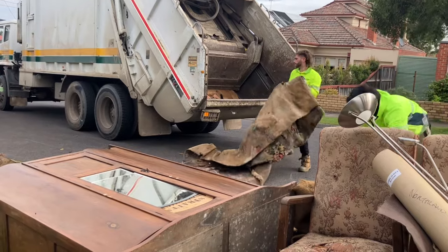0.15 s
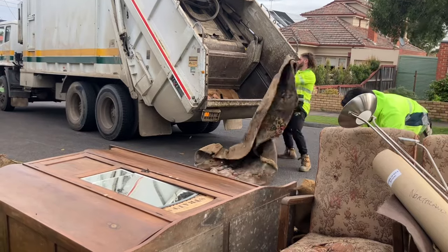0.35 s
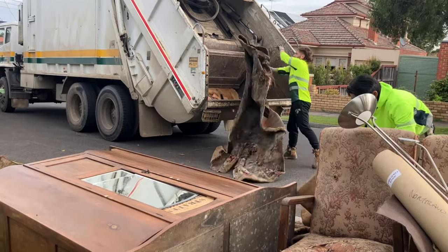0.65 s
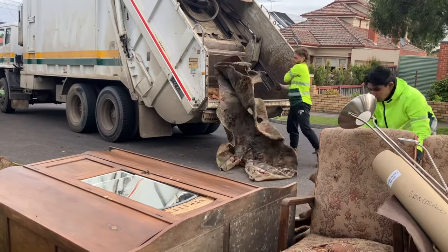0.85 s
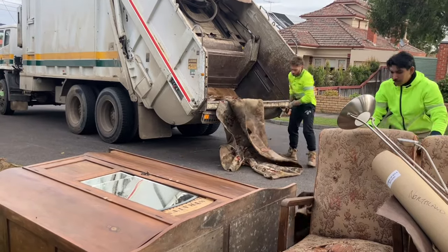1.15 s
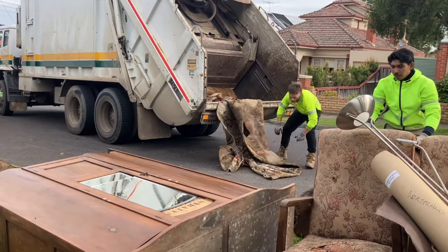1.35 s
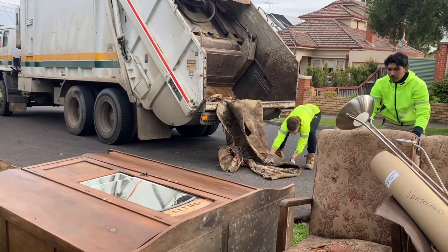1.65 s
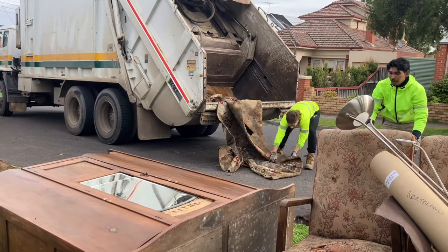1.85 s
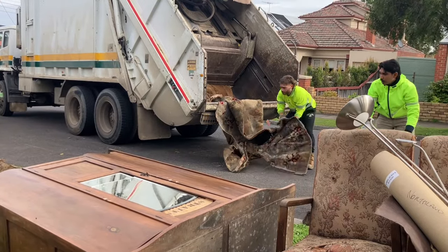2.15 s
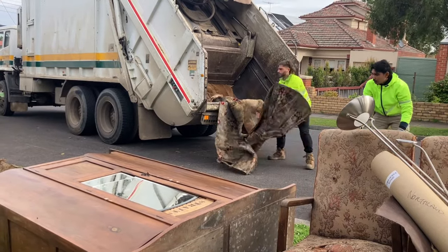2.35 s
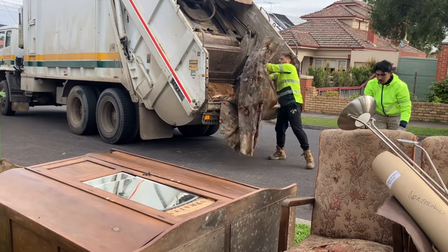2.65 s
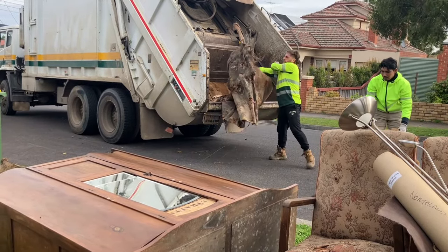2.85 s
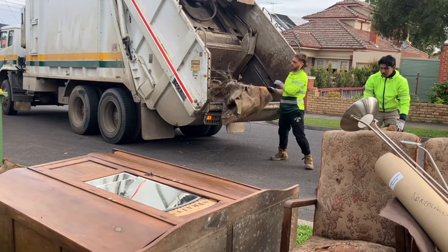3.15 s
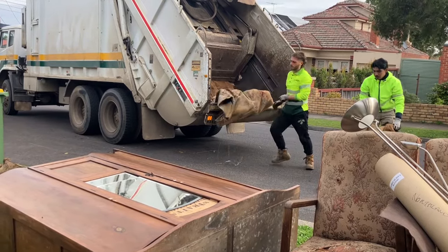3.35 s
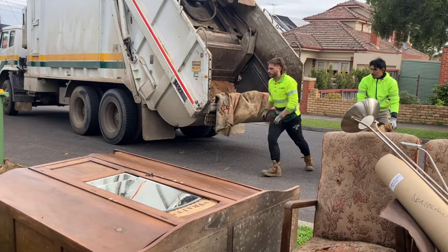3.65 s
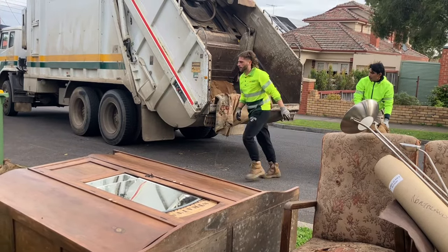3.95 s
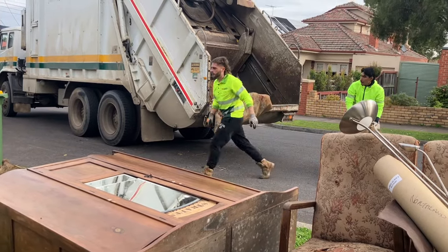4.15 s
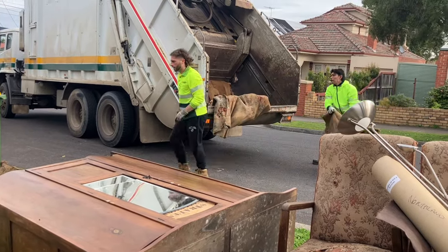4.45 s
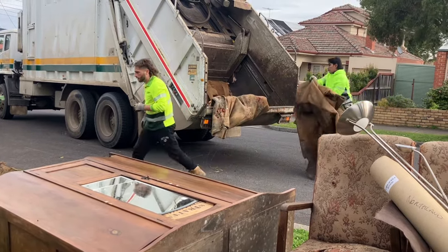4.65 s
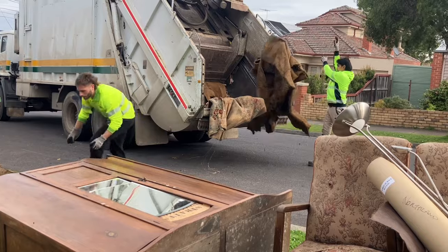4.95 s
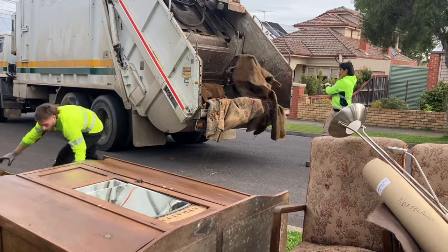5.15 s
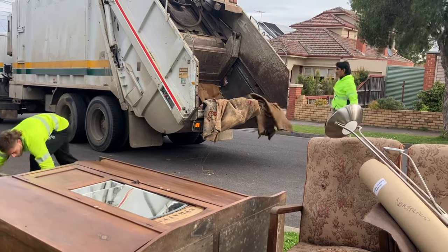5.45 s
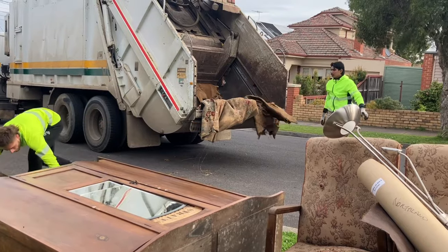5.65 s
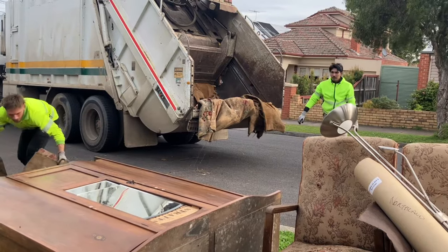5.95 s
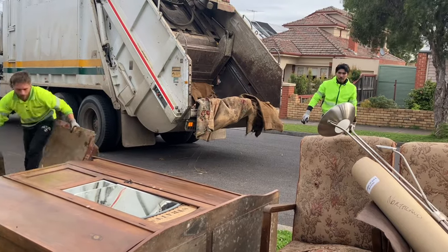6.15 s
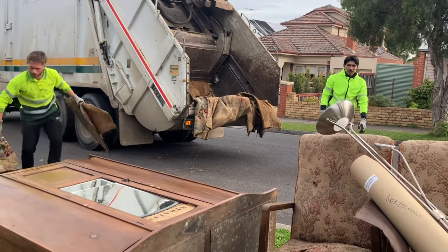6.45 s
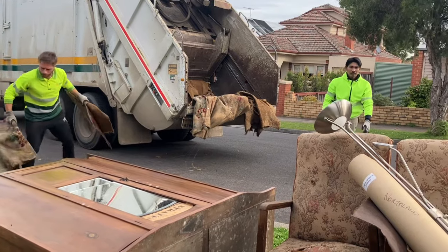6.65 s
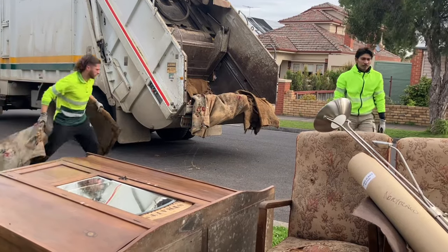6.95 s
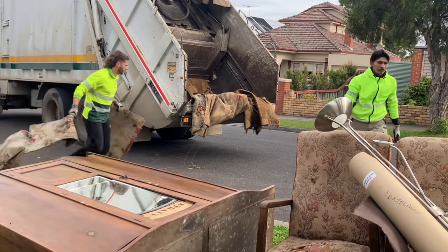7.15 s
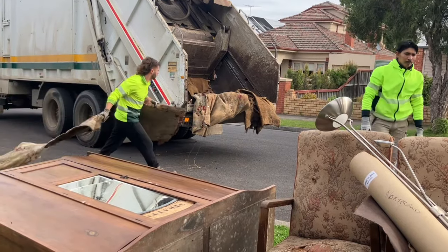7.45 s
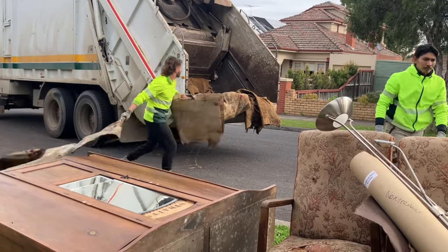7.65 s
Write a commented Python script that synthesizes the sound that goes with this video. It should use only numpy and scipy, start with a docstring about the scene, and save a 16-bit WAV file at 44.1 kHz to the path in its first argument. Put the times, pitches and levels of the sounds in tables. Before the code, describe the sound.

On a street, a refuse truck's compactor crushes rubbish over a roaring diesel and a hydraulic whine. Irregular snaps, crunches and hollow steel knocks come through a steady grinding rattle. A boomy rumble swells midway as the cracking peaks, followed by small chinks of glass. The breaking stops and the engine sinks to a quieter idle, while wind buffets the microphone on and off.

```python
"""Sharp cracks and chinks of glass over a roaring diesel: a refuse truck crushes waste at the kerb.
The engine runs fast to drive the whining hydraulic pump, then drops to idle. Each break in the packer
is a gritty burst that rings the piece and knocks the steel hopper. Wind thumps the two microphone
ports, and the bass comes and goes below an edge that slides up and down."""
import sys
import numpy as np
from scipy import signal
from scipy.fft import rfft, irfft, next_fast_len
from scipy.io import wavfile
from scipy.ndimage import uniform_filter1d, map_coordinates

SR = 44100
rng = np.random.default_rng(int(sys.argv[2]) if len(sys.argv) > 2 else 0)


def materialize(psi):
    """Save the field psi as 16-bit PCM at rate SR to the path in sys.argv[1].

    A 1-D psi becomes a single channel; in a 2-D psi each row is a channel.
    """
    bounded = np.clip(np.atleast_2d(psi).T, -1, 1)
    quanta = np.round(bounded * 32767).astype(np.int16)
    wavfile.write(sys.argv[1], SR, quanta)


N = 343738

# how hard the truck works: t/s, engine roar/dB, packer grind/dB, bright rattle/dB
WORKLOAD = [(0.0, -30, -40.5, -41.5), (0.48, -32, -38.5, -37.5), (0.6, -28.5, -38, -39),
            (0.69, -38.5, -39.5, -40.5), (0.86, -43.5, -37, -37.5), (1.11, -45.5, -37.5, -37),
            (1.42, -39.5, -40, -36.5), (1.71, -28.5, -36.5, -33), (2.26, -29.5, -37, -37),
            (2.84, -31, -37, -37.5), (3.54, -30, -31.5, -36), (4.04, -35, -32, -39), (4.4, -32, -26.5, -34),
            (4.68, -29.5, -31.5, -40.5), (5.01, -39, -35.5, -40.5), (5.6, -41.5, -38, -51),
            (5.88, -38.5, -37.5, -48.5), (6.18, -43, -40.5, -55), (6.85, -48, -41, -55),
            (7.3, -42.5, -43.5, -53.5), (7.79, -40.5, -43.5, -52.5)]


def amp(db):
    """Decibels to gain."""
    return 10 ** (np.asarray(db) / 20)


def unit(x):
    """Scaled to rms 1."""
    return x / np.sqrt(np.mean(x ** 2) + 1e-20)


def along(points, hz):
    """Reads (f/Hz, value) points on a log frequency axis."""
    f, values = np.transpose(points)
    return np.interp(np.log(hz + 1), np.log(f + 1), values)


def curves(rows):
    """One per-sample curve for each column after the time."""
    times, *columns = np.transpose(rows)
    return [np.interp(np.arange(N) / SR, times, column) for column in columns]


def wobble(rate):
    """A smooth random curve, rate knots a second."""
    return map_coordinates(rng.standard_normal(int(N * rate / SR) + 4), [np.arange(N) * rate / SR])


def filtered(x, response):
    """Applies a frequency response."""
    size = next_fast_len(N + SR // 4)
    return irfft(rfft(x, size) * response(np.fft.rfftfreq(size, 1 / SR)), size)[..., :N]


def rush(spectrum):
    """Stereo noise of rms 1, coloured by (f/Hz, level/dB) points, partly alike in both ports."""
    # likeness of the ports: f/Hz, correlation
    likeness = [(100, 1), (400, 1), (900, 0.65), (2000, 0.21), (4500, 0.15), (6500, 0.56), (9000, 1),
                (14000, 1)]
    def mid_side(hz):
        width = np.arccos(np.clip(along(likeness, hz), -1, 1)) / 2
        return amp(along(spectrum, hz)) * [np.cos(width), np.sin(width)]
    mid, side = filtered(rng.standard_normal((2, N)), mid_side)
    return unit(np.array([mid + side, mid - side]))


def attack(t, rise):
    """A soft onset with time constant rise."""
    return 1 - np.exp(-t / rise)


def ring(modes, t, spread_db):
    """Decaying modes, a little different in strength and pitch at each strike."""
    return sum(amp(db + rng.normal(0, spread_db) - 60 * t / t60)
               * np.sin(2 * np.pi * hz * rng.normal(1, 0.0068) * t) for hz, db, t60 in modes)


def swells(rows, rise, growth, fall, rest_db):
    """Gain of swells over a resting level; rise, growth while held and fall are in dB/s."""
    t = np.arange(N) / SR
    gain = amp(rest_db)
    for s, hold, db in rows:
        held_db = db + growth * np.clip(t - s, 0, hold)
        gain = gain + amp(held_db + rise * np.minimum(t - s, 0) - fall * np.maximum(t - s - hold, 0))
    return gain


def add(track, s, sound):
    """Mixes a sound in at s seconds."""
    part = track[..., round(s * SR):][..., :sound.shape[-1]]
    part += sound[..., :part.shape[-1]]


def crankshaft():
    """Turns made so far, and the load: 1 at pumping speed, 0 at idle."""
    # the revs flare as the load comes off, drop, rebound and settle: t/s, speed/(turns/s)
    revs = [(0, 16.56), (2.2, 16.56), (2.4, 17.1), (3.1, 17.1), (3.3, 16.56), (4.3, 16.56), (4.68, 16.4),
            (4.76, 17.6), (4.98, 17.6), (5.1, 16.5), (5.3, 15.6), (5.47, 14.3), (5.66, 12.75), (5.9, 13.85),
            (6.35, 12.85), (7.79, 12.65)]
    speed = uniform_filter1d(curves(revs)[0], size=SR // 16, mode="nearest")
    return np.cumsum(speed) / SR - .986, np.clip((speed - 13.5) / 1.4, 0, 1)


def hum(cycles_per_turn=31):
    """A thin tone tied to the crankshaft, clearest at idle."""
    # hum fader: t/s, level/dB
    fader = [(0, -55.5), (3.7, -43), (4.5, -45), (4.9, -58), (5.4, -56), (5.58, -36), (5.7, -38.5),
             (5.9, -45), (6.1, -37), (6.3, -41), (6.6, -44), (6.72, -58), (7.1, -49), (7.4, -47),
             (7.45, -59), (7.79, -58)]
    turns, _ = crankshaft()
    gain = amp(curves(fader)[0] + 1.4 * wobble(18))
    return gain * np.sin(2 * np.pi * cycles_per_turn * turns + .5 * wobble(10))


def wind_buffet():
    """Lumpy wind pressure on the ports."""
    # gusts: t/s at full strength, hold/s, level/dB
    gusts = [(0, 0.46, -54.5), (.46, 0.045, -36), (1.4, 0.12, -73), (1.67, 0.16, -56), (2.04, 0.26, -46),
             (2.3, 0.43, -60), (2.87, 0.039, -29), (2.94, 0.17, -17.5), (3.15, 0.12, -21.5),
             (3.36, 0.36, -48.5), (3.82, 0.26, -40), (4.21, 0.54, -30.5), (4.84, 0.25, -26.5),
             (5.42, 0.29, -32.5), (5.95, 0.037, -23.5), (6.2, 0.08, -25.5), (6.39, 0.046, -20.5),
             (6.49, 0.072, -19.5), (7.38, 0.017, -53)]
    # deep wind colour: f/Hz, level/dB
    colour = [(25, -49), (45, -1.5), (68, 1), (93, 5), (125, -3), (220, -11), (500, -34), (1500, -120)]
    gain = swells(gusts, rise=143, growth=.5, fall=650, rest_db=-105)
    return gain * unit(rush(colour) * amp(wobble(30)))


def wind_slaps():
    """Gusts slap the ports: thumps a few cycles long that drop in pitch as they land."""
    # slaps: t/s, level/dB, f/Hz
    slaps = [(0.119, -17, 398), (0.144, -12.5, 350), (0.251, -8.5, 550), (0.549, -25, 570),
             (0.557, -21, 330), (0.579, -21, 686), (0.606, -13, 684), (0.635, -21, 880), (0.655, -19, 1050),
             (0.727, -21, 1050), (0.738, -19, 1000), (0.76, -22, 1300), (0.78, -19.5, 1120),
             (0.806, -19, 1150), (0.829, -21, 1500), (1.646, -9, 677), (2.477, -14.5, 356),
             (2.636, -13.5, 314), (2.71, -12.5, 736), (2.93, -13, 110), (2.847, -19, 335),
             (3.039, -10.5, 338), (3.33, -5, 304), (3.113, -19, 149), (3.403, -8.5, 302),
             (3.437, -11.5, 755), (3.446, -10, 410), (3.49, -13, 453), (3.497, -18, 790),
             (3.545, -13.5, 520), (3.783, -13.5, 340), (3.983, -16, 328), (4.087, -8, 265),
             (4.42, -8.5, 270), (5.142, -18.5, 117), (5.921, -26, 118), (6.178, -20, 141),
             (6.221, -13.5, 188), (6.261, -17.5, 153), (6.308, -15.5, 209), (6.346, -15.5, 200),
             (6.374, -5.5, 382), (6.382, -11.5, 119), (6.392, -12, 600), (6.411, -10, 333),
             (6.436, -17, 119), (6.487, -13, 433), (6.491, -5, 180), (6.527, -12, 278), (6.546, -15, 328),
             (6.565, -9, 249), (6.586, -29, 400), (6.606, -21, 380), (6.631, -14, 420), (6.703, -24, 543)]
    out, t = np.zeros(N), np.arange(SR // 10) / SR
    for s, db, hz in slaps:
        cycles = hz * t
        sag = 1 + .5 * np.exp(-cycles / 1.34)
        envelope = attack(cycles, .3) * np.exp(-cycles / 2.04)
        add(out, s, amp(db + .35) * envelope * np.sin(2 * np.pi * cycles * sag))
    return out


def rumble():
    """A boomy rumble with the pump tone in it."""
    # rumble fader: t/s, level/dB
    fader = [(0, -28), (.3, -25), (.56, -26.5), (.9, -74), (1.2, -70), (1.39, -44), (1.67, -52),
             (1.95, -51), (2.25, -36), (2.75, -19), (3.2, -24), (3.4, -22), (3.7, -34.5), (3.8, -24),
             (4.9, -24.5), (5.05, -32.5), (6.368, -34), (6.378, -16), (6.46, -30), (6.5, -21), (6.578, -20),
             (6.59, -35.5), (6.9, -60), (7.15, -66), (7.4, -46), (7.79, -47)]
    # boomy colour: f/Hz, level/dB
    colour = [(100, -6), (170, -2), (260, -8), (335, -3.5), (363, -3.5), (392, -6), (430, -11), (550, -13),
              (900, -21.5), (2500, -120)]
    # pump tone against the boom: t/s, level/dB
    tone_fader = [(0, -5), (3.6, -5), (3.85, -1.2), (4.95, 1), (5.1, -4.5), (7.79, -2)]
    boom = unit(rush(colour) * amp(1.67 * wobble(35)))
    tone = amp(curves(tone_fader)[0]) * pump(order=1, skew=0)
    return amp(curves(fader)[0] - 2.5) * (boom + tone)


def pump(order, skew, pulses_per_turn=21):
    """One harmonic of the pump's pressure ripple, softer at idle; the ports sit at +-skew radians."""
    turns, load = crankshaft()
    phase = order * (2 * np.pi * pulses_per_turn * turns + .5 * wobble(12)) + [[skew], [-skew]]
    return amp(4.3 * wobble(9) - 3.6 * order * (1 - load)) * np.sin(phase)


def exhaust(order):
    """One slightly unsteady harmonic of the exhaust note, three firings a turn."""
    # swells of the note: t/s at full strength, hold/s, level/dB
    surges = [(.34, .01, -39), (.42, 0.037, -30.5), (.84, 0.02, -49), (1.25, 0.018, -46), (2.06, .1, -36.5),
              (2.86, 0.25, -27), (3.76, 0.15, -31), (3.92, 0.87, -24), (5.0, 0.022, -23),
              (5.23, 0.049, -21), (5.48, 0.63, -36.5), (6.25, 0.018, -32), (6.41, 0.1, -30),
              (7.25, .03, -55), (7.37, 0.028, -56), (7.66, .03, -65)]
    turns, _ = crankshaft()
    gain = swells(surges, rise=297, growth=8, fall=348, rest_db=-88) * amp(.71 * wobble(22))
    return gain * np.sin(order * (2 * np.pi * 3 * turns + .83 * wobble(9.1)))


def engine():
    """Six cylinders fire three times a turn; a valve ticks once a turn; the pump sings above."""
    # colours of the loaded roar, the idle and the valve tick: f/Hz, level/dB
    loaded_colour = [(180, -5), (300, -6.5), (355, -6.5), (544, -11.5), (703, 1), (959, -4), (1060, -4),
                     (1330, -21.5), (1460, -12), (2500, -40), (3250, -32), (5500, -120)]
    idle_colour = [(260, -22), (450, -30), (640, -8), (750, -5), (810, -9.5), (890, 3), (970, -9.5),
                   (1050, 1.5), (1150, -11), (1300, -16.5), (1580, -8.5), (1810, -65), (2600, -48),
                   (3380, -61), (5720, -120)]
    tick_colour = [(2500, -44), (3600, -4), (4200, 4), (4800, 3), (5400, 0.5), (6400, -0.5), (7500, -9),
                   (12000, -12), (15000, -45)]
    # valve tick fader: t/s, level/dB
    tick_fader = [(0, -47.5), (2, -49), (4.8, -41), (5.6, -52.5), (6, -46.5), (6.4, -56.5), (6.8, -53.5),
                  (7.79, -50.5)]
    turns, load = crankshaft()
    roar = np.sqrt(load) * rush(loaded_colour) + np.sqrt(1 - load) * rush(idle_colour)
    throb_db = .77 * np.cos(2 * np.pi * 3 * turns) + 1.65 * wobble(25) + 1.6 * wobble(80)
    roar = unit(roar * amp(throb_db))
    since_tick = (turns + .14) % 1  # in turns
    tick = unit(rush(tick_colour) * attack(since_tick, .06) * amp(-45 * since_tick + wobble(13)))
    whine = amp(-6.5) * pump(order=2, skew=.55)
    return amp(curves(WORKLOAD)[0] + .5) * (roar + whine) + amp(curves(tick_fader)[0]) * tick


def debris(count):
    """Small scraps ring briefly at random pitches, the high ones softer."""
    when, pitch, strength, damping = rng.random((count, 4)).T[..., None]
    t = np.arange(SR // 32) / SR
    octaves = 3.4 * pitch
    level_db = -2.2 * np.log(strength + .01) - 2.5 * octaves
    t60 = .032 + .27 * damping
    scraps = amp(level_db - 60 * t / t60) * np.sin(2 * np.pi * 1200 * 2 ** octaves * t)
    samples = (when * N).astype(int) + np.arange(len(t))
    return unit(np.bincount(samples.ravel(), scraps.ravel())[:N])


def grinding():
    """Waste grinds and rattles in the packer: lumpy under load, smoother at idle."""
    # colours of the grind and the bright rattle: f/Hz, level/dB
    grind_colour = [(590, -2.5), (1000, -3.5), (1300, -9), (1660, -4.5), (1810, -9), (2510, -7),
                    (2860, -14.5), (3990, -11), (5140, -15.5), (7000, -15), (9100, -46), (15400, -120)]
    rattle_colour = [(2500, -6), (4000, -6.5), (6500, -6), (8000, 2), (11000, 2), (13000, -1),
                     (15500, -9.5), (17000, -42)]
    _, grind_db, rattle_db = curves(WORKLOAD)
    _, load = crankshaft()
    busy = .3 + .7 * load
    grind = unit(rush(grind_colour) * amp(busy * (2.74 * wobble(11) + 1.9 * wobble(60))))
    rattle = unit(rush(rattle_colour) * amp(busy * (2.33 * wobble(15) + 2.9 * wobble(90))))
    return amp(grind_db) * (grind + amp(-6) * busy * debris(count=3000)) + amp(rattle_db) * rattle


def board_clacks():
    """Boards knock together with a short, dry ring."""
    # clacks: t/s, level/dB
    clacks = [(2.2293, -9), (2.2618, -8), (2.2805, -13)]
    # board modes: f/Hz, level/dB, t60/s
    modes = [(840, 1, .03), (1640, -3, 0.025), (1990, -7.5, .02)]
    out, t = np.zeros(N), np.arange(SR // 5) / SR
    for s, db in clacks:
        add(out, s, amp(db - 3) * ring(modes, t, spread_db=2) * attack(t, .00045))
    return out


def glass_chinks():
    """Struck glass rings at a pitch of its own over a shared set of bright modes."""
    # chinks: t/s, level/dB, f/Hz
    chinks = [(4.2308, -22, 10800), (4.9816, -17, 6530), (5.06, -23, 6600), (5.1257, -29, 6550),
              (5.244, -18.5, 10440), (5.4444, -28.5, 7240)]
    # glass modes: f/Hz, level/dB, t60/s
    glass = [(6500, 2, 0.21), (7000, 0, .1), (10380, 10, 0.15), (11300, 9.5, 0.092)]
    shared_modes = [(hz, db - 13, t60) for hz, db, t60 in glass]
    out, t = np.zeros(N), np.arange(SR // 5) / SR
    for s, db, hz in chinks:
        chink = ring([(hz, 0, .14)] + shared_modes, t, spread_db=1.5)
        add(out, s, amp(db - 9) * chink * attack(t, .00067))
    return out


def metal_pings():
    """Scraps of metal ring, each on one wavering pitch."""
    # pings: t/s, level/dB, f/Hz, t60/s
    pings = [(1.172, -18, 10400, .12), (2.4039, -16.5, 6250, .09), (2.612, -20, 3950, 0.066),
             (4.229, -19, 7050, 0.19), (4.2694, -16, 7080, 0.1), (4.8094, -28, 3880, .4),
             (4.8479, -28, 5100, 0.33), (4.9694, -28.5, 3130, .3)]
    out, t = np.zeros(N), np.arange(SR // 5) / SR
    for s, db, hz, t60 in pings:
        waver = .6 * wobble(150)[:len(t)]
        envelope = amp(db - 7.5 - 60 * t / t60) * attack(t, .0023)
        add(out, s, envelope * np.sin(2 * np.pi * hz * t + waver))
    return out


def hopper(knocks):
    """Knocks ring the steel hopper's resonances, which alternate in polarity."""
    # hopper modes: f/Hz, width/Hz, level/dB
    modes = [(253, 72, -14), (445, 48, -9), (649, 39, 1.5), (792, 142, 2), (901, 72, 3), (1070, 67, -5.5),
             (1513, 38, -11)]
    def steel(f):
        return sum((-1) ** k * amp(db) * 1j * f * width / (hz * hz - f * f + 1j * f * width)
                   for k, (hz, width, db) in enumerate(modes))
    return filtered(knocks, steel)


def cracks(piece_q=2.2):
    """Waste breaks in gritty bursts of tiny fractures that ring the piece and shake the hopper."""
    # breaks: t/s, level/dB, relative knock/dB, relative sizzle/dB, fade/(dB/ms), f/Hz of the piece
    breaks = [(0.1365, -22.5, 12, 0, 6, 1230), (0.2463, -18, 3.5, 0, 5, 1170),
              (0.4644, -25, -20, -3, 1, 1690), (0.9237, -30.5, -11, 3, 2, 1650),
              (1.073, -22.5, -8, -10, 5, 3240), (1.1116, -14.5, -13, 0, 6, 4930),
              (1.3637, -20, 3, -2, 8, 3500), (1.388, -35.5, -15, 12, 5, 3000),
              (1.469, -22, -36, 0.5, 3, 2510), (1.538, -24, 6, 3.5, 2, 2220),
              (1.587, -30, -13, 13.5, 4, 3050), (1.603, -27, -15, 6, 3, 2210),
              (1.635, -17, 10.5, 1.5, 1.2, 1140), (1.645, -17, 5.5, -1.5, 0.86, 2000),
              (1.68, -17.5, 8, -8, 8, 1110), (1.703, -25.5, 11, 7.5, 1.5, 1640),
              (1.7413, -33.5, -3, 16, 3, 4000), (1.7993, -32, 6, 15.5, 8, 1570),
              (1.901, -20, 10, -2, 9, 1220), (1.918, -22, -8, -4, 2.5, 1240), (2.14, -24, -2, -2, 1, 1820),
              (2.2283, -19, -3, -5, 12, 1600), (2.2594, -21, -10, 5, 6.5, 6500),
              (2.2798, -20, -16, 5, 17, 1500), (2.421, -14.5, -19, -1.5, 6.5, 2960),
              (2.612, -33, 8, 8, 1, 6000), (2.8392, -28, -9, 5.5, 5, 1230), (2.943, -25, 9, -4, 0.7, 1520),
              (3.036, -19, 2, -5, 11, 1250), (3.1042, -24, 9.5, -5, 0.7, 4950),
              (3.125, -23.5, -3, -10, 4, 4500), (3.308, -27, -21, -4, -3, 2220),
              (3.398, -24.5, -12, -4, 3, 1510), (3.468, -15, 2, -22, 3, 1270),
              (3.485, -18.5, -9, -25, 4.5, 2610), (3.597, -13.5, -11, -22, 14, 1920),
              (3.673, -16.5, -25, -17, 4, 4000), (3.69, -15, -18, -0.5, 3.5, 3530),
              (3.7791, -17.5, -2, -4, 1, 3420), (4.0635, -18, -17, -16, 2.5, 1610),
              (4.081, -11, 3, -31, 2, 2570), (4.147, -11.5, -17, -11.5, 4, 4000),
              (4.231, -31, 0, 2, -2, 1550), (4.3064, -10.5, -11, -20, 6, 2400),
              (4.33, -11, -9, -29, 7, 1420), (4.417, -13.5, -14, -15, 5, 4120),
              (4.5004, -12, -30, -17, 3, 4300), (4.5508, -12.5, -4, -17, 6, 2500),
              (4.5908, -14.5, -15, -7, 13, 1620), (4.634, -18, -4.5, -9, 0.6, 2200),
              (4.792, -21.5, -18, -26, 0.7, 2010), (4.845, -25.5, -17, -20, -0.3, 3450),]
    # colours of the snap and the sizzle above it: f/Hz, level/dB
    snap_colour = [(1000, -10), (2000, 10), (7500, -1.5), (9500, -16)]
    sizzle_colour = [(7500, -11), (10000, 1.5), (11500, -1), (15500, -7.5), (17000, -44)]
    snap_gain, sizzle_gain, knock_gain, pieces = np.zeros((4, N))
    t = np.arange(SR // 5) / SR
    for s, db, knock_db, sizzle_db, fade, hz in breaks:
        fade = max(fade, .4)
        decay = amp(-1000 * t * fade) + amp(-18.5 - 250 * t)  # the break, then a faint crunchy tail
        burst = amp(db + 1.5) * decay * attack(t, .003 / fade)  # slow breaks also start slowly
        add(snap_gain, s, burst)
        add(sizzle_gain, s, burst * amp(sizzle_db + 3 - 340 * t))
        add(knock_gain, s, burst * amp(knock_db))
        body = unit(signal.lfilter(*signal.iirpeak(hz, piece_q, SR), rng.standard_normal(len(t))))
        tone = ring([(hz, -14, .025)], t, spread_db=3)
        add(pieces, s, amp(db) * tone + amp(-3) * burst * body)
    grit = amp(3.4 * wobble(1200))
    snap = amp(-9) * snap_gain * unit(grit * rush(snap_colour))
    sizzle = amp(.5) * sizzle_gain * unit(grit * rush(sizzle_colour))
    knocks = knock_gain * rush([(100, 0), (16000, 0)])  # white noise
    return pieces + snap + sizzle + amp(15) * hopper(knocks)


def at_ports(x):
    """Places the truck: its top end reaches the left port late, and the left is a touch louder."""
    # phase between the ports: f/Hz, lead of the left/half cycles
    lead = [(500, 0), (1980, .16), (2670, .7), (4390, -.25), (5680, .2), (6900, 0), (9100, -1), (11400, -2),
            (13600, -3), (15900, -4)]
    shifted = filtered(x, lambda hz: np.exp(.5j * np.pi * np.outer([1, -1], along(lead, hz))))
    return shifted * amp([[.4], [-.4]])


def widen(x):
    """Shifts the two ports out of phase by a changing amount."""
    # bass width: t/s, side against mid/dB
    width = [(0, -20), (.5, -33), (1, -61), (5, -63), (5.6, -17), (6, -7.5), (6.5, -10.5), (7, 1),
             (7.79, -11)]
    side = amp(curves(width)[0]) * np.imag(signal.hilbert(x.mean(axis=0)))
    return x + side * [[1], [-1]]


def bass_edge(x):
    """A sliding low cut: 70 dB an octave below the edge, at most 70 dB deep."""
    # sweep of the edge: t/s, height/octaves above 100 Hz
    sweep = [(0, 1.12), (.58, 1.06), (.64, 1.97), (.76, 2.1), (.8, 2.2), (.9, 2.5), (1.02, 2.5),
             (1.08, 2.5), (1.27, 2.5), (1.36, 1.87), (1.61, 1.5), (1.65, 1.26), (1.9, 1.54), (2.1, 1.07),
             (2.45, 1.3), (2.75, 0.92), (3.3, 0.56), (3.55, 1.2), (3.75, 1.55), (4.15, 0.88), (4.3, 0),
             (6.57, -2), (6.62, 0.3), (6.67, 0.8), (6.7, 1.6), (6.77, 2.5), (6.96, 2.5), (7.05, 2.2),
             (7.2, 1.94), (7.26, 1.57), (7.42, 1.2), (7.46, 1.96), (7.6, 1.5), (7.79, 1.3)]
    hz, t, spectra = signal.stft(x, SR, nperseg=2048, noverlap=1536)
    edge_hz = 100 * 2 ** np.interp(t, *np.transpose(sweep))
    octaves_below = np.clip(np.log2(edge_hz / (hz[:, None] + 1)), 0, 1)
    return signal.istft(spectra * amp(-70 * octaves_below), SR, nperseg=2048, noverlap=1536)[1][:, :N]


def scene():
    """Truck and wind at the two ports; the exhaust fundamental and the buffet bypass the low cut."""
    truck = at_ports(engine() + grinding() + cracks() + board_clacks() + glass_chinks() + metal_pings())
    upper = truck + widen(rumble() + wind_slaps()) + hum() + amp(-11.5) * exhaust(order=2)
    low_end = amp(2) * exhaust(order=1) + wind_buffet()
    return bass_edge(upper) + widen(low_end)


def record(dry, top_hz=16200):
    """A steep high cut takes off the very top."""
    return filtered(dry, lambda hz: 1 / (1 + (hz / top_hz) ** 200))


dry = scene()
out = record(dry)
materialize(out)
```